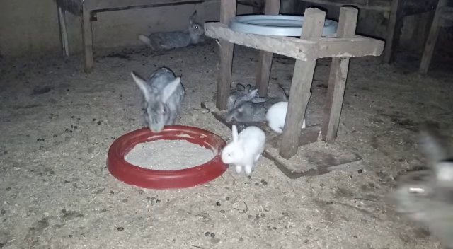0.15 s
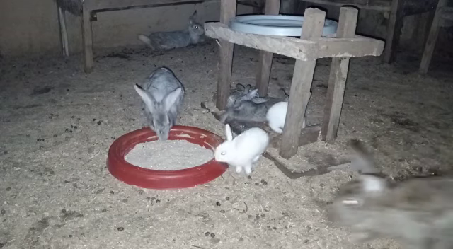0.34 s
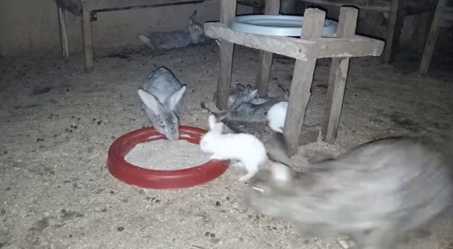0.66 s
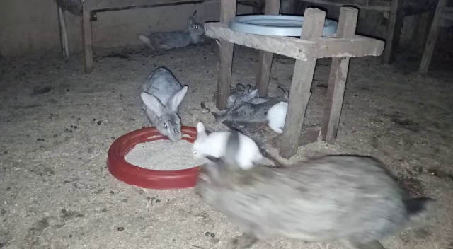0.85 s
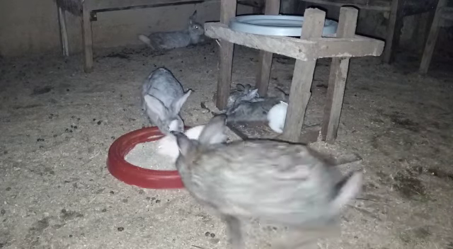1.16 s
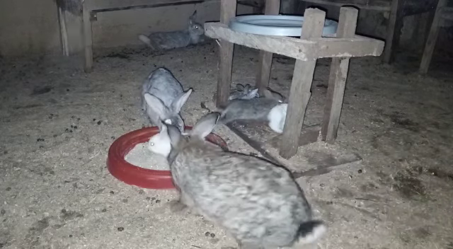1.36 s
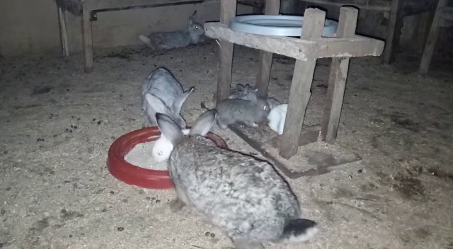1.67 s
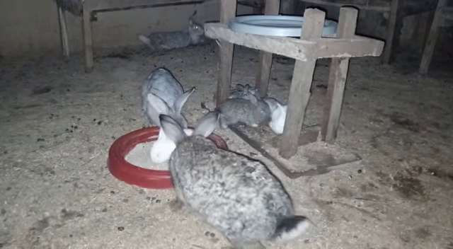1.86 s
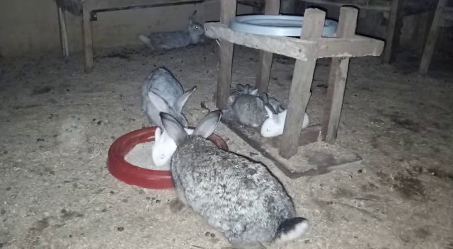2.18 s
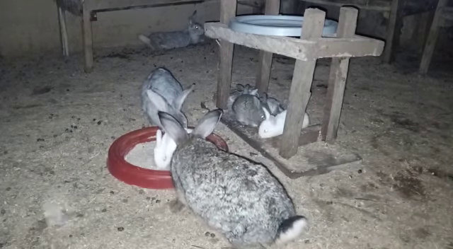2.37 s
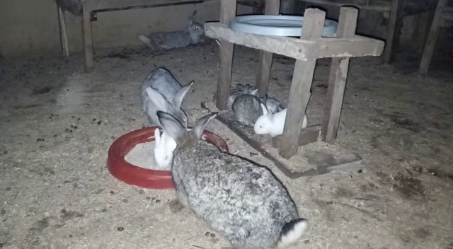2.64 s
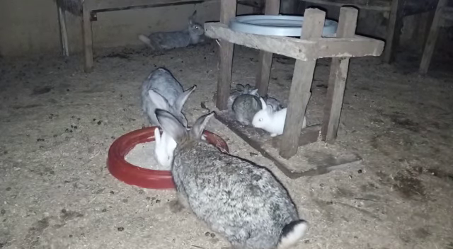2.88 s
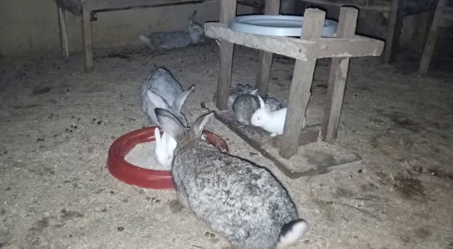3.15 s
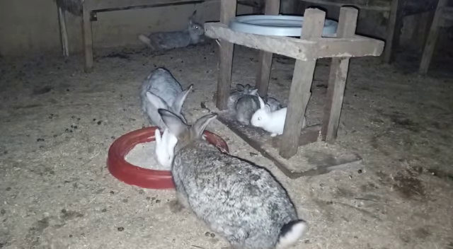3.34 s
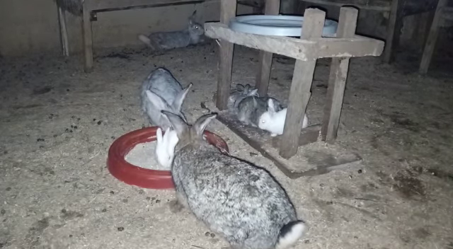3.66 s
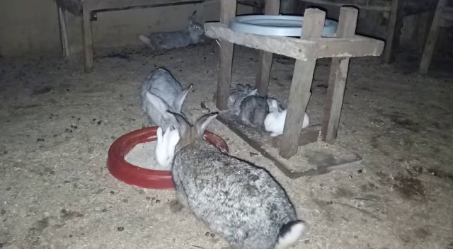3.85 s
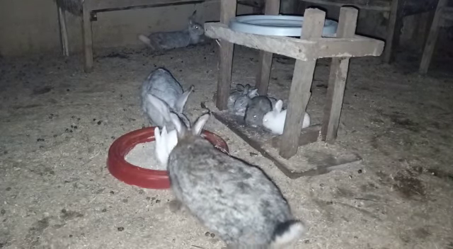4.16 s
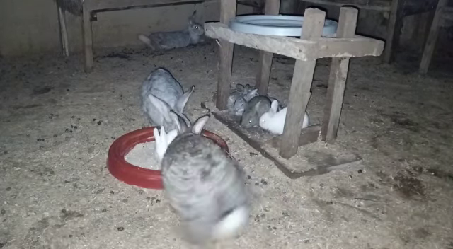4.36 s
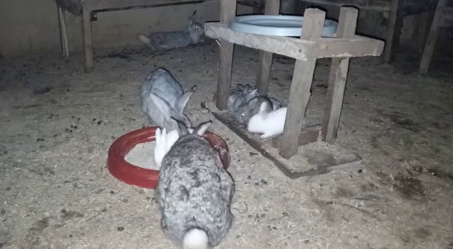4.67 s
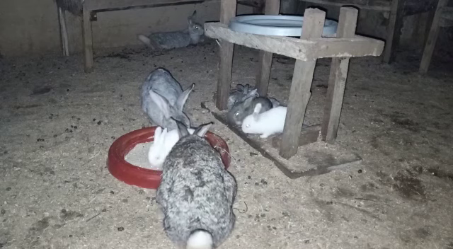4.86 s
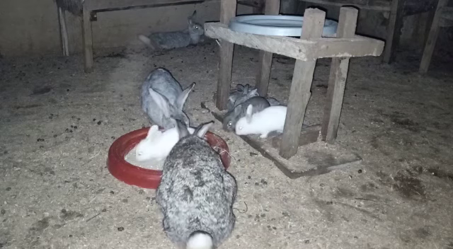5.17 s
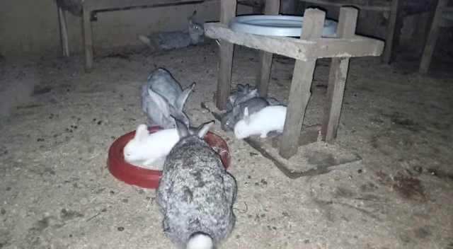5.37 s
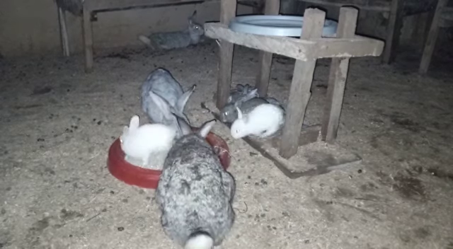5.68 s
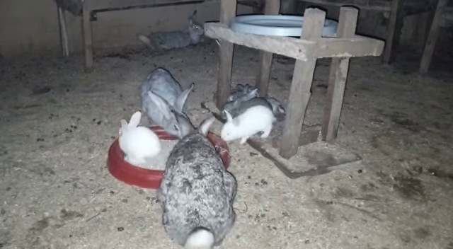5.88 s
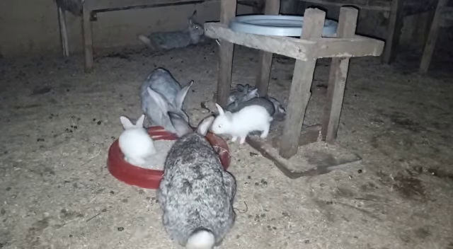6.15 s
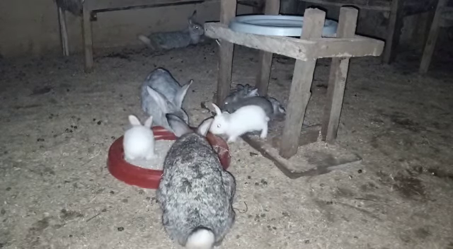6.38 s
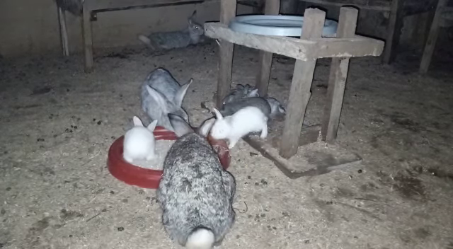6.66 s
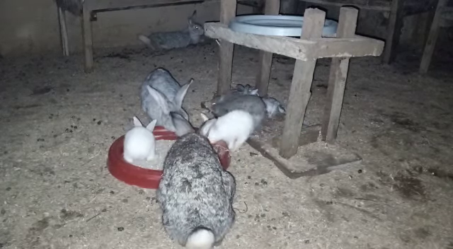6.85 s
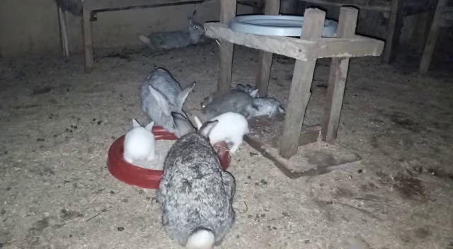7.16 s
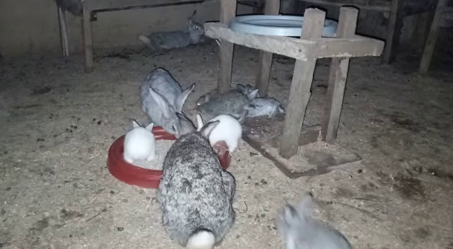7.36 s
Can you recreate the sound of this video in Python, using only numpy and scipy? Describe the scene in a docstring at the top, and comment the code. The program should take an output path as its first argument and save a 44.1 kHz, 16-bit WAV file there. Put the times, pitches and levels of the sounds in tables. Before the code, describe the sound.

A single close cricket sings nonstop in an earth-floored shed at night, about nine bright, slightly raspy chirps a second around seven kilohertz. Far below it, rabbits scuff dry litter: a brief rustle just after one second, small scratches midway, and more near the end. Hops are barely felt thuds. A small, thin microphone catches short wooden reflections and faint night air.

```python
"""A cricket chirps steadily in a rabbit shed at night, about nine chirps a second.
Each chirp is four falling tones with tooth noise, one per wing stroke, reflected by the walls and roof.
Rabbits scuff the straw (shaped noise bursts) and land on the earth (low, damped oscillations).
A faint low call is a falling tone with one overtone; at times a wing catches with a bright noise tick.
Filtered noise gives the night air and the insects further off."""
import sys
import numpy as np
from scipy import signal
from scipy.fft import rfft, irfft, next_fast_len
from scipy.io import wavfile

SR = 44100
rng = np.random.default_rng(int(sys.argv[2]) if len(sys.argv) > 2 else 0)


def wrap_up_sound(samples):
    """Save the sound to the file named by the first command line argument, as 16-bit audio."""
    columns = np.atleast_2d(samples).T
    # keep every value between -1 and 1, then stretch to whole-number steps
    tamed = np.clip(columns, -1, 1)
    steps = np.round(tamed * 32767).astype(np.int16)
    wavfile.write(sys.argv[1], SR, steps)


N = 331632  # samples
TIME = np.arange(N) / SR  # s
FREQS = np.fft.rfftfreq(N, 1 / SR)  # Hz
LEAD = SR // 10  # samples kept ahead of time zero, for strokes that begin before it


def amp(db):
    """Level law: converts decibels to an amplitude ratio."""
    return 10 ** (np.asarray(db) / 20)


def unit(x):
    """Normalisation: scales a signal to rms 1."""
    return x / np.sqrt(np.mean(x ** 2) + 1e-24)


def add(mix, s, sound):
    """Superposition: adds a sound to the mix at time s, cut to the ends of the mix."""
    start = int(round(s * SR))
    sound = sound[max(-start, 0):]
    part = mix[max(start, 0):][:len(sound)]
    part += sound[:len(part)]


def colour(x, points):
    """Linear filtering: weights the spectrum by (Hz, dB) points joined on a log frequency axis."""
    hz, db = np.transpose(points)
    f = np.fft.rfftfreq(len(x), 1 / SR)
    gain = amp(np.interp(np.log(f + 1), np.log(hz + 1), db))
    return irfft(rfft(x) * gain, len(x))


def band(x, hz, octaves):
    """Band-pass filtering: a Gaussian pass band on the octave scale."""
    f = np.fft.rfftfreq(len(x), 1 / SR) + 1
    bell = np.exp(-.5 * (np.log2(f / hz) / octaves) ** 2)
    return irfft(rfft(x) * bell, len(x))


def drift(seconds):
    """Slow random fluctuation: low-passed noise of rms 1."""
    low_pass = np.exp(-(FREQS * seconds) ** 2)
    return unit(irfft(rfft(rng.standard_normal(N)) * low_pass, N))


def shed(x, t60, build):
    """Diffuse reverberation: dense reflections build up over build [s] and decay 60 dB in t60 [s]."""
    t = TIME[:SR // 2]
    decay = amp(-60 * t / t60)
    growth = 1 - np.exp(-(t / build) ** 2)
    tail = rng.standard_normal(len(t)) * decay * growth
    return signal.fftconvolve(x, tail / np.linalg.norm(tail))[:len(x)]


def chirp_times():
    """Periodic excitation: chirps follow each other evenly until the next run takes over."""
    # even runs of chirps, each at its own pace: (start [s], chirp period [s])
    runs = [(-0.0112, 0.1051), (0.5142, 0.1103), (0.8451, 0.1065), (1.4842, 0.1046), (2.5306, 0.1111),
            (2.6417, 0.1045), (2.9551, 0.1096), (3.1742, 0.1068), (3.7082, 0.103), (3.8112, 0.1062),
            (4.873, 0.1144), (5.2163, 0.1395), (5.3558, 0.1132), (5.5822, 0.106), (6.1124, 0.105),
            (6.8472, 0.1151), (6.9623, 0.1056)]
    ends = [start for start, _ in runs[1:]]
    ends.append(N / SR + runs[-1][1])
    times = [np.arange(start, end - period / 2, period) for (start, period), end in zip(runs, ends)]
    return np.concatenate(times)


def wings(pitch_jitter=.0015, time_jitter=.0002, flutter=0.038, rasp_spread_db=3.2, scrape_rise=.08, scrape_fall=.3):
    """Stridulation: a file slowing over its scraper gives falling tones and tooth noise.

    Jitters are a share of the pitch and [s]; rise and fall of the scrape are shares of a stroke.
    """
    # wing strokes of one chirp: (start from the chirp time [s], relative level [dB], first pitch [Hz],
    # last pitch [Hz], length [s], relative overtone level [dB], relative scrape level [dB])
    strokes = [(-.041, -35, 6620, 6070, 0.021, -14, -15), (-.0325, -16, 7750, 6580, .016, -7, -8),
               (-.0176, -3, 7800, 6770, 0.018, -9.5, 2), (-.0004, -0.5, 7860, 6636, .0185, -19.5, -1)]
    # pressure of the file along a stroke: (share of the stroke, relative level [dB])
    pressure = [(0, -27), (.1, -15.5), (.243, 1), (.321, 0.5), (.408, -5.5), (.549, 0), (.666, -6),
                (.78, -17.5), (1, -24.5)]
    # how hard the cricket sings: (time [s], relative level [dB])
    effort = [(0, -1.1), (1.6, -.4), (3.9, -.1), (5.2, -.4), (6.3, -1.1), (7.4, -.3)]
    # how well the small wings radiate: (frequency [Hz], gain [dB])
    radiation = [(2500, -100), (5000, -29.5), (6100, 0), (16000, 0)]
    # spectrum of the scraping file teeth: (frequency [Hz], relative level [dB])
    scrape_spectrum = [(3000, -80.5), (4800, -49.5), (5600, -27.5), (6300, -6.5), (7300, 8.5), (8400, 1),
                       (9300, -5), (10500, -15), (12000, -32), (14000, -26), (16000, -28)]
    tone, teeth = np.zeros((2, next_fast_len(N + 2 * LEAD)))
    for s in chirp_times():
        chirp_db = np.interp(s, *np.transpose(effort))
        for start, db, first_hz, last_hz, length, overtone_db, scrape_db in strokes:
            u = np.linspace(0, 1, int(length * SR))  # share of the stroke
            detune, late, bite, *wobble = rng.standard_normal(11)
            uneven = np.interp(u, np.linspace(0, 1, len(wobble)), wobble)
            glide = first_hz + (last_hz - first_hz) * u
            hz = glide * (1 + pitch_jitter * (detune + uneven))
            phase = 2 * np.pi * np.cumsum(hz) / SR
            press = amp(np.interp(u, *np.transpose(pressure)))
            press *= signal.windows.tukey(len(u), .1) * (1 + flutter * uneven)
            # the wing rings purer as it slows
            overtone = amp(overtone_db + .5 - 23 * u) * np.sin(2 * phase)
            # the teeth rasp as the wings meet
            rasp = (1 - np.exp(-u / scrape_rise)) * np.exp(-u / scrape_fall)
            at = LEAD / SR + s + start + time_jitter * late
            add(tone, at, amp(chirp_db + db) * press * (np.sin(phase) + overtone))
            add(teeth, at, amp(scrape_db + rasp_spread_db * bite) * rasp)
    scrape = teeth * rng.standard_normal(len(teeth))
    return colour(tone, radiation), colour(scrape, scrape_spectrum)


def cricket(tone_db=-27.6, scrape_db=-45.5, tail_db=-7, scrape_tail_db=-2, absorb_db=-12):
    """Room response: direct sound, early reflections and a tail; the walls soak up the overtone."""
    # reflections from ground, walls and roof: (delay [s], relative level [dB])
    echoes = [(.001303, 5), (.001648, -0.5), (.005502, -15), (.008732, 0), (.009199, -0.8), (0.01, -19.5),
              (0.0129, -7), (0.0131, -0.5), (.018517, -5.5), (.018589, -9), (.024828, -11), (0.0324, -14.5),
              (0.0358, -16.5), (0.0425, -17.5)]
    tone, teeth = wings()
    reflected = amp(tail_db) * shed(tone, t60=0.28, build=0.023)
    f = np.fft.rfftfreq(len(tone), 1 / SR)
    # a delay is a phase that turns in proportion to frequency
    early = sum(amp(db) * np.exp(-2j * np.pi * f * delay) for delay, db in echoes)
    reflected += irfft(rfft(tone) * early, len(tone))
    song = tone + colour(reflected, [(8000, 0), (14000, absorb_db)])
    scrape = teeth + amp(scrape_tail_db) * shed(teeth, t60=0.18, build=0.0029)
    return (amp(tone_db) * song + amp(scrape_db) * scrape)[LEAD:LEAD + N]


def night(far_hz=2380, far_db=-97, hiss_db=-98, neighbour_hz=6250, high_hz=5350, high_db=-98, air_db=-81.7):
    """Random noise: still air, hiss, a distant cricket as a narrow band, and two fluctuating choruses."""
    # spectrum of the night air: (frequency [Hz], relative level [dB])
    air_spectrum = [(15, -29.5), (25, 3), (43, .5), (90, 2), (210, -1), (650, -10.5), (2060, -17.5),
                    (2350, -14), (2750, -18.5), (3920, -20), (5000, -18.5), (6500, -48.5), (11000, -120)]
    # the distant cricket: (time [s], level [dB])
    neighbour_levels = [(0, -87.5), (4.05, -84), (4.25, -70.5), (4.7, -68), (4.9, -85.5), (7.5, -86)]
    # each drift swings a level by a random number of decibels
    air = unit(colour(rng.standard_normal(N), air_spectrum))
    air = amp(air_db) * air * amp(0.77 * drift(0.082))
    far = unit(band(rng.standard_normal(N), far_hz, .04))
    chorus = amp(far_db) * far * amp(3.8 * drift(.07))
    high = unit(band(rng.standard_normal(N), high_hz, .04))
    chorus += amp(high_db) * high * amp(5.4 * drift(.04))
    neighbour = unit(band(rng.standard_normal(N), neighbour_hz, .03))
    neighbour *= amp(np.interp(TIME, *np.transpose(neighbour_levels)))
    return air + chorus + neighbour + amp(hiss_db) * rng.standard_normal(N)


def straw(t, length, clump=.42, spiky=.7, rise_s=.0055):
    """Friction noise: clumped snaps of straw, and the quick push of a paw that drives them."""
    knots = np.linspace(0, t[-1], num=60)
    snaps = rng.standard_normal(len(t)) * np.exp(spiky * np.minimum(rng.standard_normal(len(t)), 2))
    clumps = np.exp(clump * np.interp(t, knots, rng.standard_normal(len(knots))))
    push = (1 - np.exp(-t / rise_s)) * np.exp(-(t / length) ** 4)
    return snaps * clumps, push


def pushed(x, push):
    """Amplitude modulation: lays a push over a texture, so that it has rms 1 at full pressure."""
    return unit(x * push) * np.sqrt(np.mean(push ** 2))


def scuffs(room_db=-7, level_db=2.3, sag_octaves=.15, grit_share=.7):
    """Friction noise: straw sounds duller as the paw slows, with grit over the first share of a scuff."""
    # paws and muzzles in the straw: (start [s], relative level [dB], length [s], centre [Hz],
    # width [octaves], relative grit level [dB])
    scuff_list = [(.23, -84, .056, 1033, .38, -95), (.517, -87.5, .055, 1780, .43, -95),
                  (.698, -83, .03, 1000, .35, -97), (1.086, -73, .06, 1920, .27, -86),
                  (1.218, -61, .088, 810, .36, -65), (1.3, -71.5, .1, 800, .5, -82),
                  (2.615, -77.5, .045, 1950, .17, -73), (3.095, -83, .05, 850, .7, -86),
                  (3.36, -78.5, .11, 480, .36, -88), (3.771, -79, .04, 1120, .32, -91),
                  (4.134, -72, .066, 3050, .32, -72), (4.688, -70.5, .052, 1000, .46, -77),
                  (5.729, -75, .038, 1700, .4, -83), (5.938, -79.5, .03, 1130, .45, -92),
                  (6.045, -82.5, .085, 1080, .45, -94), (6.58, -63.5, .045, 1000, .5, -72),
                  (7.188, -78, .084, 510, .6, -95), (7.338, -68, .08, 590, .55, -90),
                  (7.39, -65, .06, 1560, .46, -69)]
    # spectrum of the crackling grit: (frequency [Hz], relative level [dB])
    grit_spectrum = [(200, -17), (550, -10), (1100, -14), (1600, -1), (2050, 0), (2600, -11), (4000, -12),
                     (6000, -18), (12000, -33)]
    out, t = np.zeros(N), TIME[:SR // 3]
    for s, db, length, hz, octaves, grit_db in scuff_list:
        snaps, push = straw(t, length)
        slowed = np.minimum(t / length, 1)
        fast = band(snaps, hz, octaves)
        slow = band(snaps, hz / 2 ** sag_octaves, octaves)
        rustle = (1 - slowed) * fast + slowed * slow
        add(out, s, amp(level_db + db) * pushed(rustle, push))
        snaps, push = straw(t, grit_share * length)
        add(out, s, amp(level_db + grit_db) * pushed(colour(snaps, grit_spectrum), push))
    return out + amp(room_db) * shed(out, t60=0.33, build=0.0037)


def stirs(per_s=2.5, level_db=-92, length_s=.04, centre_hz=1200, spread_octaves=.8, octaves=.45):
    """Random events: small stirs of the other rabbits at chance moments, each with its own pitch."""
    out, t = np.zeros(N), TIME[:SR // 3]
    for when, pitch in rng.random((round(per_s * N / SR), 2)):
        snaps, push = straw(t, length_s)
        hz = centre_hz * 2 ** (spread_octaves * (2 * pitch - 1))
        add(out, when * N / SR, amp(level_db) * pushed(band(snaps, hz, octaves), push))
    return out


def catches(level_db=-3, tick_hz=9800, octaves=.3, decay_s=.005, room_db=-1):
    """Impulsive excitation: a wing that catches gives a short bright tick, which the shed draws out."""
    # ticks of the wings: (time [s], relative level [dB])
    tick_list = [(0.3915, -59), (0.6215, -59), (1.2401, -61), (1.484, -62), (2.0931, -58), (2.2009, -61),
                 (2.5072, -60), (2.6244, -60), (5.0724, -59), (5.454, -60), (5.7763, -57), (6.3031, -59),
                 (6.9441, -58), (7.3667, -59)]
    out, t = np.zeros(N), TIME[:SR // 16]
    for s, db in tick_list:
        tick = unit(band(rng.standard_normal(len(t)), tick_hz, octaves))
        add(out, s, amp(level_db + db) * np.exp(-t / decay_s) * tick)
    return out + amp(room_db) * shed(out, t60=.13, build=.003)


def moans(overtone_db=-13, room_db=-1):
    """Harmonic tone: a soft falling call with its second harmonic, blurred by the shed."""
    # the faint low call: (start [s], level [dB], length [s], first pitch [Hz], last pitch [Hz])
    call_list = [(0.715, -68, .175, 250, 196)]
    out = np.zeros(N)
    for s, db, length, first_hz, last_hz in call_list:
        hz = np.linspace(first_hz, last_hz, int(length * SR))
        phase = 2 * np.pi * np.cumsum(hz) / SR
        voice = np.sin(phase) + amp(overtone_db) * np.sin(2 * phase)
        add(out, s, amp(db) * signal.windows.tukey(len(phase), .5) * voice)
    return out + amp(room_db) * shed(out, t60=0.5, build=0.014)


def hops(ground_hz=62, rise=0.014):
    """Damped oscillation: a landing gives the ground a dull push, at its height after rise [s]."""
    # soft landings on the earth: (time [s], peak level of the envelope [dB])
    landings = [(0.912, -66), (3.088, -67), (3.229, -74), (3.77, -74.5), (4.16, -66), (4.708, -67),
                (4.91, -64.5), (5.27, -73), (5.419, -66.5), (5.779, -67), (6.34, -70), (6.499, -71),
                (6.89, -68), (7.41, -70)]
    out, t = np.zeros(N), TIME[:SR // 4]
    for s, db in landings:
        envelope = t / rise * np.exp(1 - t / rise)
        hz = ground_hz * rng.uniform(.93, 1.07)
        add(out, s, amp(db) * envelope * np.sin(2 * np.pi * hz * t))
    return out


def boards(x):
    """Resonance: the peaks and dips that the boards put on sounds in the shed."""
    # resonances among the boards: (frequency [Hz], width [Hz], gain at the centre [dB])
    resonances = [(700, 100, 2), (830, 40, 0.5), (970, 100, -2), (1220, 180, 1.5), (1980, 280, 2.5),
                  (6900, 24, -2), (7079, 36, 1.5), (7240, 22, 4), (7460, 92, -3.5), (7613, 35, 2)]
    db = sum(db / (1 + (2 * (FREQS - hz) / width) ** 2) for hz, width, db in resonances)
    return irfft(rfft(x) * amp(db), N)


def scene():
    """Superposition: the cricket and the rabbits inside the shed, over the night outside."""
    inside = boards(cricket() + catches() + scuffs() + stirs())
    return (inside + hops() + moans() + night())[None]


def record(dry, low_cut_hz=46, edge_hz=15950):
    """Band limitation: the small microphone loses the deep bass, then the treble ends at edge_hz."""
    high_pass = signal.butter(3, low_cut_hz, "highpass", fs=SR, output="sos")
    thin = signal.sosfilt(high_pass, dry)
    low_pass = signal.firwin(511, edge_hz, window=("kaiser", 9), fs=SR)
    return signal.oaconvolve(thin, low_pass[None], "same")


dry = scene()
out = record(dry)
wrap_up_sound(out)
```